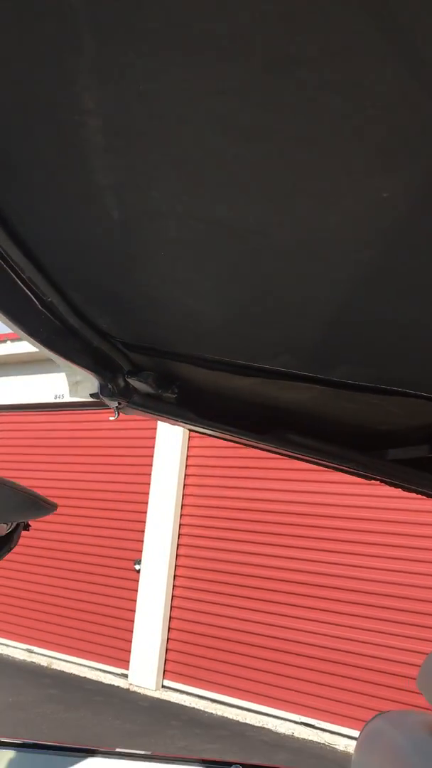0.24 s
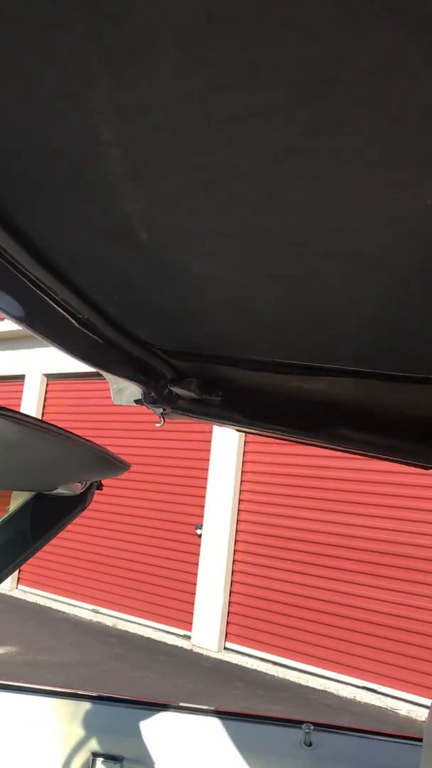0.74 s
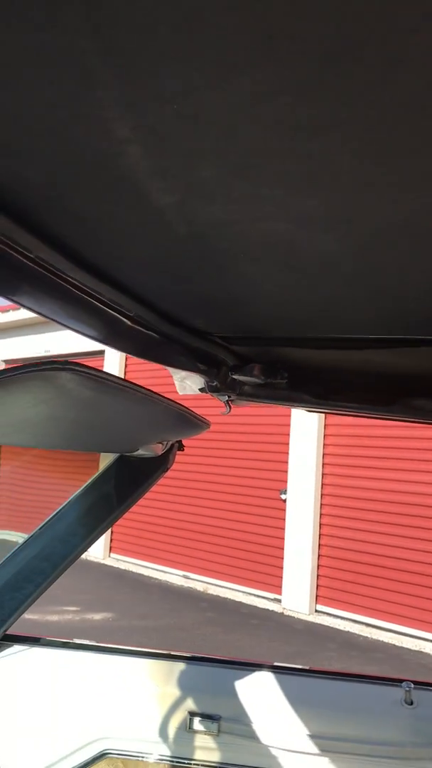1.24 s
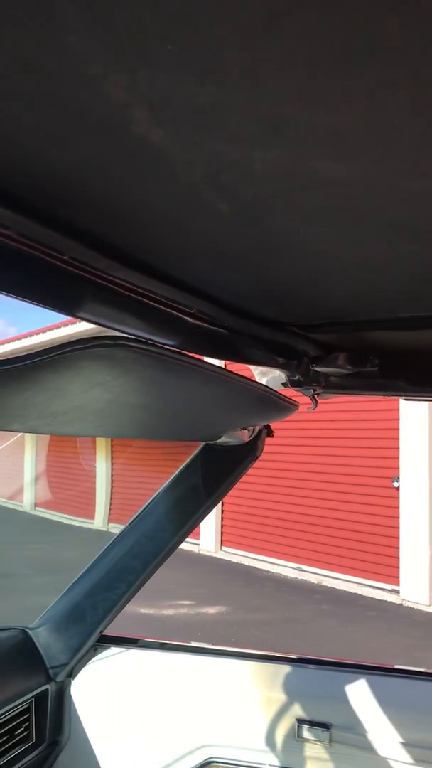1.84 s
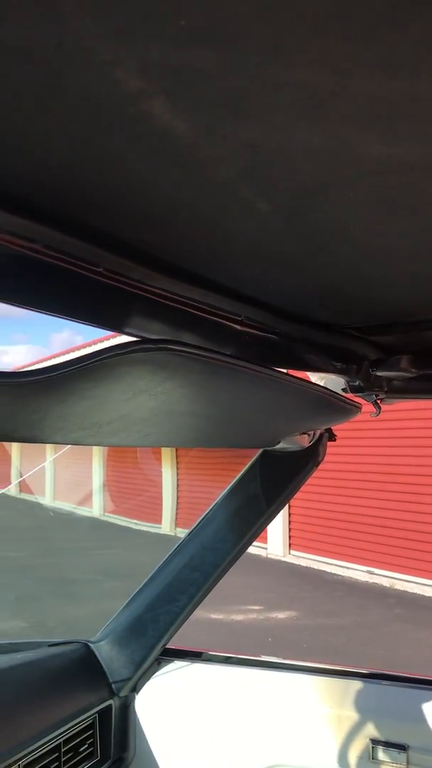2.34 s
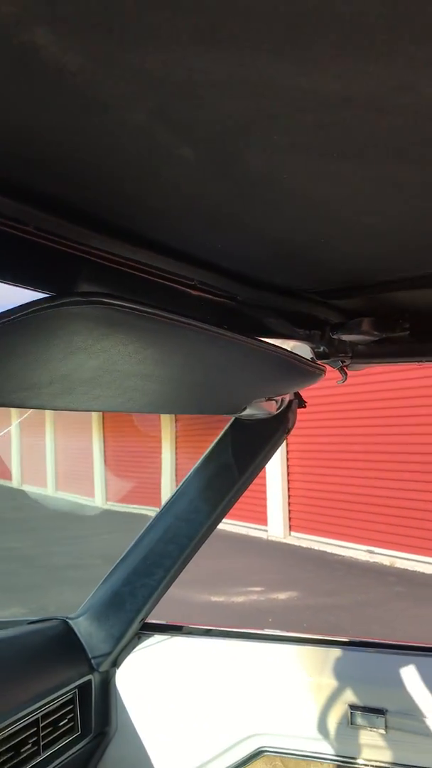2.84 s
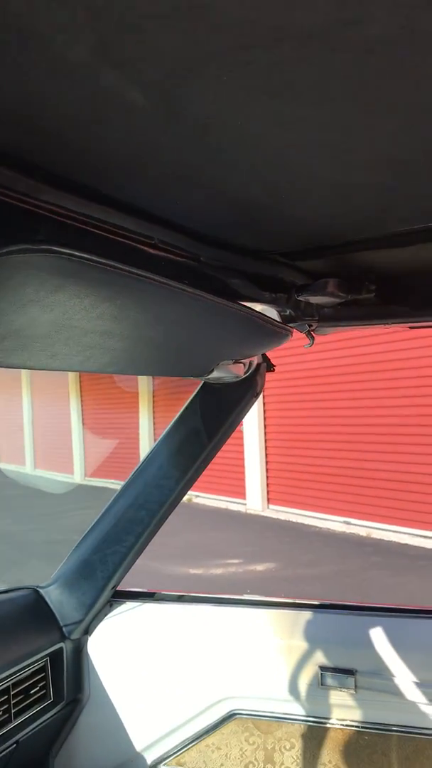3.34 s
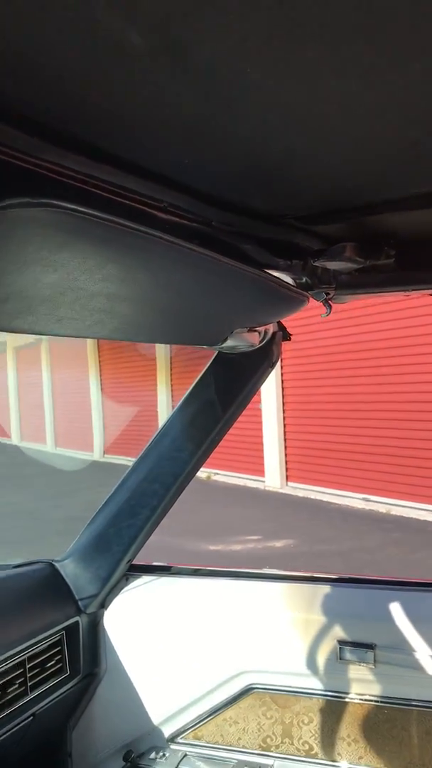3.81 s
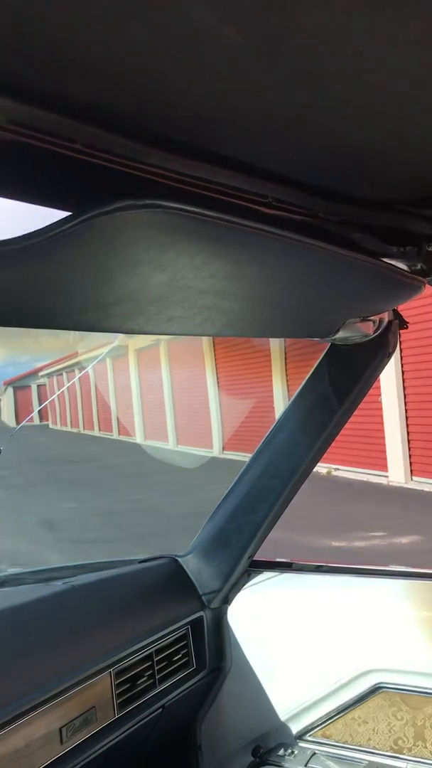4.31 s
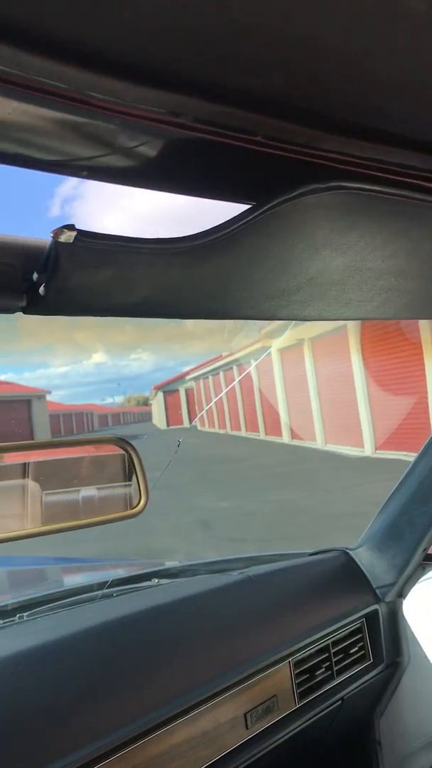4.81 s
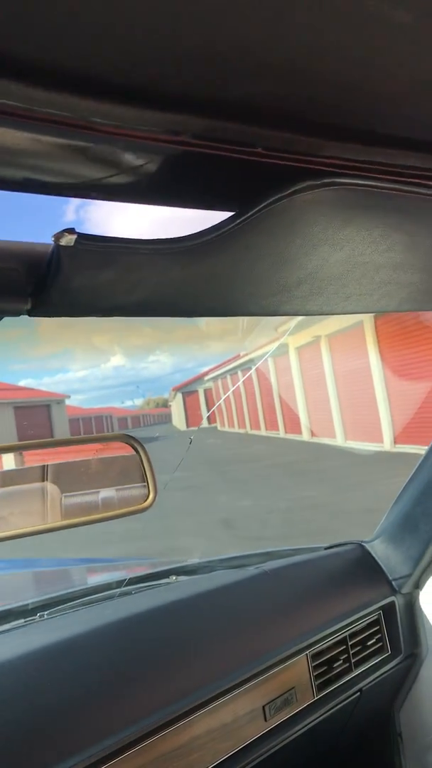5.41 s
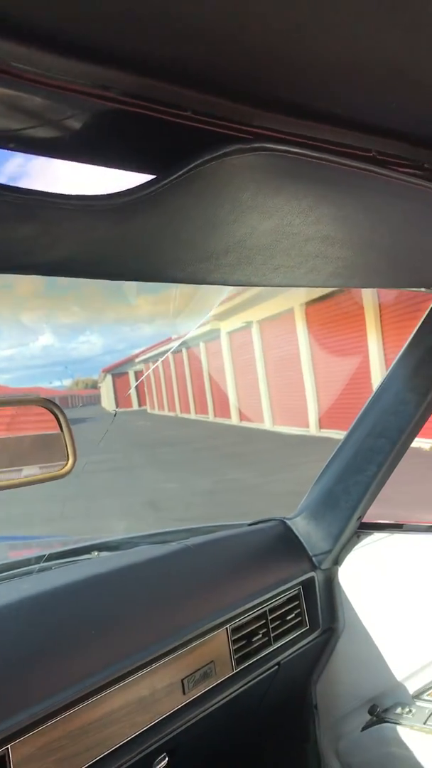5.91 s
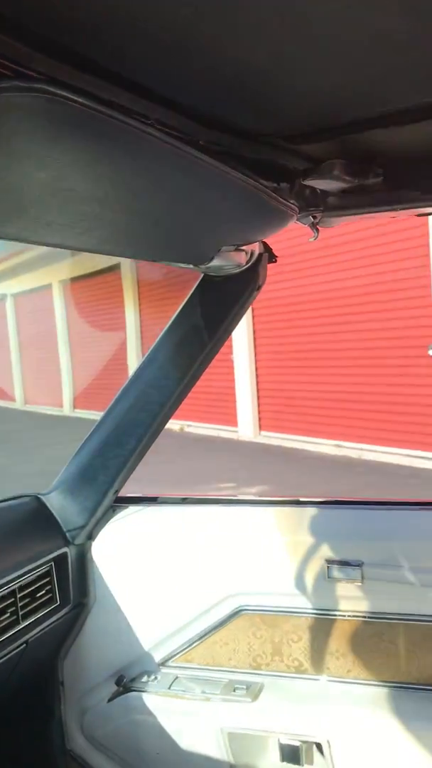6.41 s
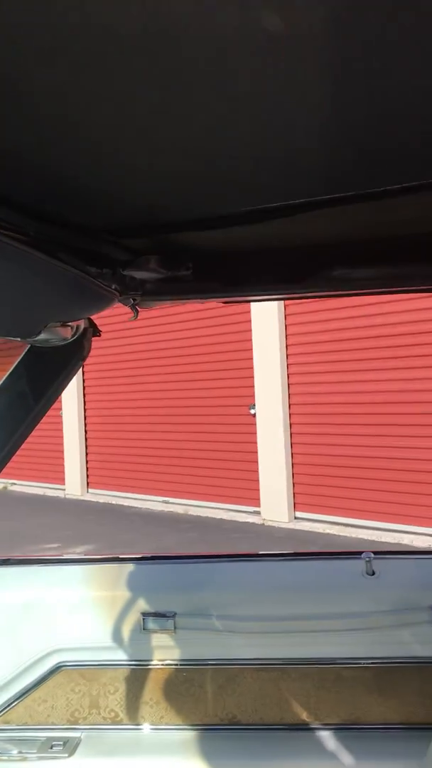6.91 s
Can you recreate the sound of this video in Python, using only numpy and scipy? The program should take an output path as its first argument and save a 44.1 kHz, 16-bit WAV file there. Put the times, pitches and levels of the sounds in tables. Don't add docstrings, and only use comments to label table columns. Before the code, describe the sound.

Inside an open car, the engine lopes and rattles, a closing roof whirrs and knocks, then one rev swells and settles amid soft wind rumble.

```python
import sys
import numpy as np
from scipy import signal
from scipy.io import wavfile
from scipy.ndimage import uniform_filter1d

SR = 44100
rng = np.random.default_rng(int(sys.argv[2]) if len(sys.argv) > 2 else 0)


def invert_db(x):
    u = np.asarray(x, float) / 20
    return 10 ** u


def wrap_up_sound(samples):
    columns = np.atleast_2d(samples).T
    tamed = np.clip(columns, -1, 1)
    steps = np.round(tamed * 32767).astype(np.int16)
    wavfile.write(sys.argv[1], SR, steps)


N = 315315
T = np.arange(N) / SR


def evened(x):
    return x / np.sqrt(np.mean(x ** 2) + 1e-20)


def curve(rows):
    times, values = np.transpose(rows)
    return np.interp(T, times, values)


def step(s, width):
    return .5 + .5 * np.tanh((T - s) / width)


def swell(s, half_s):
    return np.exp(-((T - s) / half_s) ** 2)


def drift(rate):
    coarse = T[::64]
    rates = np.geomspace(rate / 10, rate, num=16)
    return evened(sum(np.sin(2 * np.pi * (f * coarse + rng.random())) for f in rates))


def slow(rate):
    return np.interp(T, T[::64], drift(rate))


def noise(points, patchy_db, size=1024):
    hz = np.fft.rfftfreq(size, 1 / SR)
    real, imaginary, patches = rng.standard_normal((4 * N // size + 5, len(hz), 3)).T
    patches = uniform_filter1d(patches, size=8, axis=0)
    patches = evened(uniform_filter1d(patches, size=8, axis=1))
    point_hz, point_db = np.transpose(points)
    colour_db = np.interp(np.log(hz + 1), np.log(point_hz + 1), point_db)
    spectra = (real + 1j * imaginary) * invert_db(colour_db[:, None] + patchy_db * patches)
    return evened(signal.istft(spectra, nperseg=size, noverlap=size * 3 // 4)[1][:N])


def resonate(x, hz, width):
    radius = np.exp(-np.pi * width / SR)
    turn = np.exp(2j * np.pi * hz / SR)
    return 2 * signal.lfilter([1 - radius], [1, -radius * turn], x).real


def resonant_noise(count, hz, width):
    return evened(resonate(resonate(rng.standard_normal(count), hz, width), hz, width))


def pulse(count, rise_s, fall_s):
    t = T[:count]
    return np.exp(-t / fall_s) * (1 - np.exp(-t / rise_s))


def ring(hz, t60, rise):
    t = T[:int(t60 * SR)]
    return np.sin(2 * np.pi * hz * t) * invert_db(-60 * t / t60) * (1 - np.exp(-t / rise))


def add(mix, s, sound):
    part = mix[round(s * SR):][:len(sound)]
    part += sound[:len(part)]


def rattle(hz, t60, spread):
    out = np.zeros(int(t60 * SR) + 400)
    for detune, late, size in rng.random((4, 3)):
        mode = ring(hz * (1 + spread * (detune - .5)), t60, 0.00025)
        add(out, 0.0088 * late ** 2, (0.25 + 0.24 * size) * mode)
    return out


def open_sky():
    return np.exp(-T / 2.5)


# time in seconds, crank speed in rpm.
CRANK_SPEED = [(0.0, 730.3), (0.78, 715.5), (1.0, 689.9), (1.26, 709.0), (2.1, 705.2), (2.2, 726.9),
               (2.56, 703.1), (3.18, 740.8), (3.58, 702.1), (3.97, 745.0), (4.07, 766.3), (4.65, 983.5),
               (5.21, 817.5), (5.49, 779.1), (5.71, 805.5), (6.49, 844.5), (6.75, 826.7), (7.15, 712.1)]


def crank():
    return uniform_filter1d(curve(CRANK_SPEED), round(.12 * SR), mode="nearest")


def cycles():
    first_turn = .027
    return first_turn + np.cumsum(crank()) / 120 / SR


def closings(share):
    return np.flatnonzero(np.diff(np.floor(cycles() - share)))


# time in seconds, level of the firing tone in dB.
LOAD = [(0, -31.5), (1.1, -31), (1.45, -30.5), (1.65, -30.5), (2.9, -30), (3.62, -31.5), (3.8, -29),
        (4.05, -28), (4.42, -21.5), (4.62, -27), (5.0, -26), (5.3, -29.5), (6.0, -27), (6.52, -24.5),
        (6.9, -30), (7.15, -30.5)]


def load_db():
    return curve(LOAD)


def effort_db():
    return load_db() + 30


BANKS = [1, -1, -1, 1, -1, 1, 1, -1]
# frequency in Hz, phase in radians.
PATH_TOGETHER = [(60, .1), (96, -2.8), (110, -5.2), (143, -10.2), (165, -13.8), (300, -30)]
# frequency in Hz, phase in radians.
PATH_APART = [(30, 4), (53, .7), (65, -1.6), (76, -3.5), (89, -4.1), (101, -5.5), (115, -7.5), (300, -30)]


def harmonic(multiple, db, wander_db, cut=((0, 0), (1, 0))):
    k = int(multiple)
    hz = k * crank()[::64] / 120
    if k % 2:
        lead = np.angle(np.fft.fft(BANKS))[k % 8]
        path = PATH_APART
    else:
        lead = 2 * np.pi * rng.random() * (k % 8 > 0)
        path = PATH_TOGETHER
    lead = lead + np.interp(hz, *np.transpose(path))
    gain = invert_db(db + np.interp(hz, *np.transpose(cut)) + wander_db * drift(12))
    wave = np.cos(2 * np.pi * k * cycles() + np.interp(T, T[::64], lead))
    return np.sqrt(2) * np.interp(T, T[::64], gain) * wave


# multiple of the cycle rate, level in dB.
FIRING = [(8, 1.02)]
# multiple of the cycle rate, level in dB.
OCTAVE = [(16, 0.34)]
# frequency in Hz, gain in dB.
BOOM = [(92, -17), (95, -8), (98, -6), (103, -12), (107, -18.5), (110, -11), (114, -32), (120, -34)]
# multiple of the cycle rate, level in dB.
BURBLE = [(5, -8), (7, -25), (9, -8), (10, -7.5), (11, 2), (12, -8.5), (13, 1)]
# multiple of the cycle rate, level in dB.
UPPER_BURBLE = [(14, -24), (15, -3.5), (17, -7)]
# frequency in Hz, gain in dB.
CABIN_CUT = [(90, 1.5), (98, 7), (103, 0), (109, -35), (119, -9.5)]
# multiple of the cycle rate, level in dB.
STEADY = [(6, -44.5), (19, -52), (21, -58.5), (23, -58.5), (24, -47.5), (27, -58), (29, -50), (32, -58.5),
          (48, -54)]
# frequency in Hz, gain in dB.
PIPE_CUT = [(150, -0.1), (165, -4.5), (190, -13.5), (230, -9.5)]


def exhaust():
    wander_db = 0.75
    steady = sum(harmonic(k, db, 3.0, PIPE_CUT) for k, db in STEADY)
    firing = sum(harmonic(k, db, 0.38) for k, db in FIRING)
    firing += sum(harmonic(k, db, wander_db, BOOM) for k, db in OCTAVE)
    burble = sum(harmonic(k, db, wander_db) for k, db in BURBLE)
    burble += sum(harmonic(k, db, wander_db, CABIN_CUT) for k, db in UPPER_BURBLE)
    burble_db = -40 + 0.82 * effort_db() - 6 * open_sky()
    return steady + invert_db(load_db()) * firing + invert_db(burble_db) * burble


# centre in seconds, half length in seconds, rise in dB.
GUSTS = [
    (.1, 0.096, 2),
    (0.76, 0.26, 4.5),
    (1.616, 0.22, 6),
    (3.7, 0.062, 7),
    (5.878, 0.55, 9.5),
]


def gust_db():
    return sum(db * swell(s, half_s) for s, half_s, db in GUSTS)


# frequency in Hz, density in dB per Hz.
ROAR = [(120, -5.5), (200, -1), (343, -4.5), (430, -7), (487, -7.5), (532, -13.5), (610, -8.5),
        (1060, -13.5), (2280, -20.5), (4000, -29.5), (5200, -45), (8800, -120)]
# frequency in Hz, density in dB per Hz.
PUFF = [(120, -11), (200, -7.5), (350, -7.5), (550, -16), (900, -59), (2000, -90)]


def roar():
    throb = 1 + 0.013 * np.cos(2 * np.pi * (cycles() - .7))
    roar_db = -49 + 4.5 * open_sky() - 0.17 * effort_db() + 0.25 * slow(8.1)
    wide = invert_db(roar_db) * throb * noise(ROAR, 1.85)
    return wide + invert_db(-62 + 1.14 * gust_db()) * noise(PUFF, 0.95)


# frequency in Hz, density in dB per Hz.
RUMBLE = [(20, -42), (33, -42), (50, -4.5), (105, -3), (125, -17.5), (170, -6), (230, -17.5), (330, -21.5),
          (700, -85)]


def rumble():
    latched_db = -11.5 * step(5.27, 0.23)
    return invert_db(-44 + 0.56 * effort_db() + latched_db + gust_db()) * noise(RUMBLE, 1.7, size=4096)


# frequency in Hz, wavering in Hz, level in dB.
PUMP_LINES = [(283, 8, -64), (442.4, 19.7, -61.5), (532, 7.9, -63.5)]
# centre in seconds, half length in seconds, rise in dB.
WHIRR_SWELL = (2.28, 0.46, 3.2)


def pump():
    hum = np.zeros(N)
    for hz, waver, db in PUMP_LINES:
        tone = np.sin(2 * np.pi * np.cumsum(hz + .3 * waver * slow(8)) / SR)
        blur = evened(resonate(rng.standard_normal(N), hz, waver))
        hum += invert_db(db + 3.0 + 1.2 * slow(5)) * (1.13 * tone + 0.61 * blur)
    hum *= invert_db(-10.5 * step(4, .15))
    middle_s, half_s, swell_db = WHIRR_SWELL
    whirr_db = -55.5 + swell_db * swell(middle_s, half_s) - 25 * step(4.76, 0.034)
    return hum + invert_db(whirr_db) * resonant_noise(N, 1060, 690)


def sky():
    return invert_db(-57) * swell(0, 0.81) * resonant_noise(N, 1800, 1200)


# centre in Hz, spread in Hz, level in dB.
PING_BANDS = [(4420, 130, -6.5), (5750, 480, -1), (6500, 480, 0.5), (8000, 900, -4.5), (3000, 1600, -7),
              (9400, 900, -5.5)]


def pings():
    out = np.zeros(N)
    for when, pick, detune, size, long in rng.random((round(130 * N / SR), 5)):
        hz, spread, db = PING_BANDS[int(pick * len(PING_BANDS))]
        squeak = ring(hz + spread * (detune - .5), .05 * (.5 + long), 0.0026)
        add(out, when * N / SR, invert_db(db - 3.0 * np.log(size + .02)) * squeak)
    return evened(out)


# time in seconds, valve gear level in dB.
FACING = [(0, -51), (.7, -51.5), (3.1, -53.5), (3.7, -53.5), (4.22, -49.5), (4.45, -50), (4.7, -56),
          (5.05, -60), (5.67, -53.5), (6.55, -53.5), (7.15, -56)]


def facing_db():
    return curve(FACING)


# share of the cycle, puff level in dB, edge level in dB.
VALVES = [
    (.04, -9, -16),
    (.165, -2, -8),
    (.29, -7, -14),
    (.415, 0, 1),
    (.54, -8, -14),
    (.665, 0, -9),
    (.79, 4, 4),
    (.88, -2, -12),
]
# frequency in Hz, density in dB per Hz.
GEAR = [(1200, -1), (2000, -6.5), (2500, -7), (3900, 0.5), (4380, -1.5), (4900, -2.5), (5700, 2),
        (6500, 1.5), (7000, -0.5), (8600, -1), (10500, -10.5), (12500, -14.5), (15600, -22), (19000, -50)]
# frequency in Hz, density in dB per Hz.
CLATTER = [(3000, -26), (5000, -42), (8000, 10), (10500, -4.5), (13000, -31), (15500, -26), (19000, -46)]
# frequency in Hz, width in Hz, level in dB.
COVER = [(2875, 140, -18), (4390, 42, -13.5), (5720, 510, -9.5), (6480, 690, -7.5), (7800, 140, -25),
         (8500, 170, -21.5)]


def valve_gear():
    kicks, edges = np.zeros(N), np.zeros(N)
    for share, db, edge_db in VALVES:
        at = closings(share)
        force_db = 2.2 * rng.standard_normal(len(at))
        kicks[at] = invert_db(db + force_db)
        edges[at] = invert_db(edge_db + 0.29 * force_db)
    gate = 0.63 + 1.08 * signal.oaconvolve(kicks, pulse(2500, 0.0075, 0.007))[:N]
    edge = signal.oaconvolve(edges, pulse(1200, 0.0011, 0.0064))[:N]
    out = evened(gate * noise(GEAR, 2.12, size=256))
    out += invert_db(-13) * evened(edge * noise(CLATTER, 4.0, size=256))
    for hz, width, db in COVER:
        drive = gate ** 2 * invert_db(5.5 * slow(25)) * rng.standard_normal(N)
        out += invert_db(db) * evened(resonate(drive, hz, width))
    return invert_db(facing_db() - .7) * (out + invert_db(-8.0) * gate * pings())


# share of the cycle, level in dB.
BRIGHT = [
    (.165, -6),
    (.41, 0),
    (.665, -5),
    (.79, -4),
]
# start in seconds, peak level in dB.
SPARKS = [(0.4569, -59), (0.7277, -53), (0.7721, -44), (0.8959, -52), (1.0046, -55), (1.068, -47),
          (1.1124, -53), (1.2401, -52), (1.286, -48), (1.3039, -53), (1.3678, -53), (1.4721, -54),
          (1.708, -56), (1.7474, -48), (1.9594, -49), (2.0448, -56), (2.0882, -49), (2.2159, -55),
          (2.2533, -50), (2.2967, -54), (2.3171, -53), (2.4219, -54), (2.4872, -53), (2.592, -54),
          (2.6334, -55), (2.6554, -52), (2.7611, -51), (2.8245, -52), (3.0904, -52), (3.1318, -54),
          (3.5877, -46), (3.6331, -52), (3.8187, -49), (3.9205, -44), (3.9823, -51), (4.0821, -47),
          (4.138, -47), (4.2078, -53), (4.2303, -51), (4.2857, -49), (4.347, -54), (4.372, -53),
          (5.5662, -52), (6.2557, -54), (6.9247, -58)]


def bright_ticks():
    hits, sparks = np.zeros(N), np.zeros(N)
    for share, db in BRIGHT:
        at = closings(share)
        hits[at] = invert_db(db + 1.5 * rng.standard_normal(len(at)))
    for s, db in SPARKS:
        add(sparks, s, invert_db(db - 8.5) * pulse(1500, .003, .012))
    band = signal.butter(4, [10500, 15000], "band", fs=SR, output="sos")
    thin = evened(signal.sosfilt(band, resonate(rng.standard_normal(N), 10500, 5000)))
    gate = signal.oaconvolve(hits, np.exp(-T[:1200] / .007))[:N]
    return invert_db(-27.5 + facing_db()) * evened(gate * thin) + sparks * thin


# start in seconds, peak level in dB, frequency in Hz.
TAPPETS = [(0.1326, -26.5, 5870), (0.2743, -26, 5800), (0.2927, -19.5, 5750), (0.4564, -36, 6550),
           (0.9031, -21.5, 5900), (1.1331, -27, 8270), (1.3047, -27, 6250), (1.6449, -31, 5800),
           (1.8135, -25, 5780), (1.8819, -27, 6070), (2.055, -27, 5360), (2.6571, -23.5, 5500),
           (2.7624, -30, 6320), (2.8257, -26, 6600), (3.1515, -27, 6700), (3.9826, -24, 6480),
           (4.0435, -26, 6480), (4.0814, -33, 5880), (4.1163, -27, 7350), (4.1387, -21.5, 5500),
           (4.2335, -27, 6400), (4.2849, -30, 6550), (4.4231, -25, 6370), (4.4343, -27, 4600),
           (4.5304, -25, 6490), (4.5523, -23.5, 5720), (5.4996, -42, 5830), (5.5665, -34, 7300),
           (5.8, -31, 6600), (6.5433, -29, 6500), (6.8321, -33, 6500)]
# start in seconds, peak level in dB, frequency in Hz.
SOFT_TAPPETS = [(0.0273, -44, 6420), (0.0623, -47, 6530), (0.5616, -42, 5900), (0.6265, -41, 6700),
                (0.6898, -41, 6190), (0.7302, -41, 5670), (0.9682, -43, 5950), (1.0291, -40, 6420),
                (1.1109, -43, 6520), (1.1992, -47, 6470), (1.3673, -41, 6010), (1.4775, -45, 6600),
                (1.7105, -38, 6010), (2.3211, -37, 5850), (2.4743, -43, 6500), (2.4894, -43, 5420),
                (2.9891, -44, 6620), (3.2969, -46, 6410), (3.3877, -38, 6470), (3.6326, -42, 5490),
                (3.6526, -38, 5560), (3.7988, -44, 6400), (3.8816, -45, 5850), (4.2712, -37, 6410),
                (4.3725, -41, 6640), (4.4074, -37, 6650), (5.8182, -37, 6500), (6.2317, -43, 5790),
                (6.4004, -38, 6450), (6.5181, -46, 6400), (6.6887, -44, 6670)]
# start in seconds, peak level in dB, frequency in Hz.
HIGH_TAPPETS = [(0.8992, -43, 7240), (0.9356, -44, 7430), (0.9631, -43, 8250), (1.0688, -43, 7820),
                (1.1362, -41, 8400), (1.3038, -42, 7660), (1.4744, -43, 7670), (1.5807, -46, 7370),
                (1.7867, -38, 8700), (1.8106, -41, 7990), (2.1524, -46, 8000), (2.4861, -39, 8030),
                (2.529, -46, 8020), (2.6303, -43, 8600), (2.6577, -43, 8020), (2.761, -46, 7730),
                (2.8253, -41, 8340), (3.0947, -44, 7920), (3.1531, -43, 8450), (3.2963, -44, 8000),
                (3.4195, -41, 8260), (3.7622, -43, 8250), (3.9223, -44, 7640), (3.9578, -46, 7300),
                (3.9822, -40, 7650), (4.0815, -40, 8280), (4.1147, -38, 7520), (4.1389, -34, 8420),
                (4.1788, -45, 8230), (4.2845, -41, 7460), (4.3718, -44, 8370), (4.4237, -43, 7590),
                (5.2174, -47, 8320), (5.4963, -44, 8030), (5.5666, -35, 7300), (5.6439, -43, 7540),
                (5.9672, -39, 7800), (6.2012, -39, 8100), (6.5419, -48, 7840), (6.8332, -46, 8010)]


def tappets():
    out = np.zeros(N)
    for s, db, hz in TAPPETS:
        add(out, s, invert_db(db - 13.0) * rattle(hz, 0.041, 0.042))
        add(out, s, invert_db(db - 17.0) * rattle(1.3 * hz, 0.05, 0.12))
    for s, db, hz in SOFT_TAPPETS:
        add(out, s, invert_db(db - 2.0) * rattle(hz, 0.045, 0.045))
    for s, db, hz in HIGH_TAPPETS:
        add(out, s, invert_db(db - 2.0) * rattle(hz, 0.03, 0.036))
    return out


# start in seconds, peak level in dB.
SOFT_SHIELD = [(0.0687, -51), (0.4304, -50), (0.5836, -57), (0.6335, -50), (1.041, -53), (1.28, -53),
               (1.4795, -47), (1.6212, -53), (2.1635, -51), (2.2593, -54), (2.9637, -54), (3.3019, -57),
               (3.483, -56), (3.8003, -53), (3.8282, -47), (4.1305, -46), (4.2477, -50), (4.4897, -47),
               (4.9147, -52), (4.9442, -47), (5.5608, -52), (5.649, -45), (5.7394, -54), (5.9559, -56),
               (6.118, -54), (6.559, -52), (6.9631, -55)]
# start in seconds, peak level in dB.
SHIELD = [(0.1286, -41), (0.46, -41), (0.789, -43), (1.308, -36), (1.377, -46), (1.6506, -45), (2.324, -47),
          (2.466, -48), (2.488, -35.5), (2.803, -44), (2.826, -38), (2.981, -41.5), (3.135, -41),
          (3.1692, -52), (3.7643, -47), (3.97, -46), (4.4343, -44), (5.2235, -46.5), (5.3727, -46),
          (5.4999, -40), (5.5238, -45), (5.678, -47), (5.8257, -45), (6.0506, -47), (6.8488, -46)]


def shield():
    out = np.zeros(N)
    hz, t60 = 4410, 0.094
    for s, db in SOFT_SHIELD:
        add(out, s, invert_db(db - 0.5) * rattle(4400, 0.09, 0.05))
    for s, db in SHIELD:
        add(out, s, invert_db(db - 2.0) * rattle(hz, t60, 0.065))
        add(out, s + .018, invert_db(db - 7.5) * rattle(.995 * hz, t60, 0.05))
    return out


# frequency in Hz, density in dB per Hz.
SNAP_COLOUR = [(250, -6), (500, -5), (1200, -6), (2400, -18.5), (3700, -7.5), (5200, -8.5), (7500, -4),
               (9300, -9), (10500, -29.5), (15700, -33), (19000, -55)]
# start in seconds, peak level in dB.
SNAP = [
    (0.773, -23),
]


def latch_snap():
    out, grit = np.zeros(N), noise(SNAP_COLOUR, .8, size=256)
    shake = np.minimum(0.98 * np.exp(-(T[:5000] - .011) / 0.016), 1)
    for s, db in SNAP:
        add(out, s, invert_db(db - 9.0) * shake * grit[:5000])
    return out


# start in seconds, peak level in dB, frequency in Hz.
BUMPS = [(1.481, -15.5, 56.3), (1.531, -13.5, 93), (1.549, -24, 118), (1.636, -24, 129), (1.724, -24, 107),
         (1.742, -25, 120), (1.777, -18.5, 167), (3.688, -27, 120), (3.721, -18, 105), (6.052, -29, 100),
         (7.132, -24, 110)]


def bumps():
    out = np.zeros(N)
    for s, db, hz in BUMPS:
        add(out, s, invert_db(db + 6) * ring(hz, 3.4 / hz, 0.0046))
        add(out, s, invert_db(db - 5.0) * ring(2.27 * hz, 3.4 / hz, 0.0026))
    return out


# start in seconds, peak level in dB, frequency in Hz, treble level in dB.
KNOCKS = [
    (2.161, -33, 1450, -25),
    (2.5096, -32, 1410, -16),
    (3.1183, -30.5, 1410, -17),
    (3.7635, -28, 1353, -21),
    (4.734, -40, 990, -25),
    (5.5007, -32.5, 1410, -14.5),
    (5.562, -34, 1380, -12),
    (5.6448, -29, 1320, -20),
]


def linkage_knocks():
    out, grit = np.zeros(N), noise(SNAP_COLOUR, .8, size=256)
    for s, db, hz, treble_db in KNOCKS:
        for factor, part_db, t60 in [(1, 12, 0.0092), (1.2, -1, 0.013), (2.2, -14, 0.027)]:
            knock = invert_db(db + part_db) * ring(factor * hz, t60, 0.0013)
            add(out, s, knock)
            add(out, s + 0.0082, -.25 * knock)
            add(out, s + .012, .27 * knock)
        contact = grit[round(s * SR):][:1500] * np.exp(-T[:1500] / 0.012)
        add(out, s, invert_db(db + treble_db + 2) * contact)
    return out


# start in seconds, peak level in dB, frequency
# in Hz, width in Hz.
SCUFFS = [
    (4.071, -36, 2020, 750),
    (5.567, -54, 13000, 3500),
    (5.567, -39, 6860, 3000),
    (6.488, -44, 1200, 1400),
    (6.4, -46.5, 2100, 450),
    (6.9, -45, 3600, 360),
]


def cloth_scuffs():
    out = np.zeros(N)
    for s, db, hz, width in SCUFFS:
        add(out, s, invert_db(db - 3) * resonant_noise(1500, hz, width) * np.exp(-T[:1500] / .008))
    return out


# start in seconds, level in dB, frequency in Hz, decay by 60 dB in seconds.
TAP = (6.4872, -30, 600, .006)


def tap():
    out = np.zeros(N)
    s, db, hz, t60 = TAP
    add(out, s, invert_db(db) * ring(hz, t60, .0002))
    return out


def scene():
    engine = exhaust() + roar() + rumble() + valve_gear() + bright_ticks() + tappets() + shield()
    roof = pump() + sky() + latch_snap() + linkage_knocks() + cloth_scuffs() + tap()
    return (engine + roof + bumps())[None]


def low_pass(x):
    return signal.sosfilt(signal.butter(12, 15720, fs=SR, output="sos"), x)


def record(dry):
    high_pass = signal.butter(5, 38, "high", fs=SR, output="sos")
    mix = signal.sosfiltfilt(high_pass, dry)
    return low_pass(mix)


dry = scene()
out = record(dry)
wrap_up_sound(out)
```